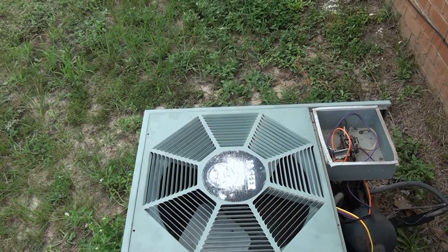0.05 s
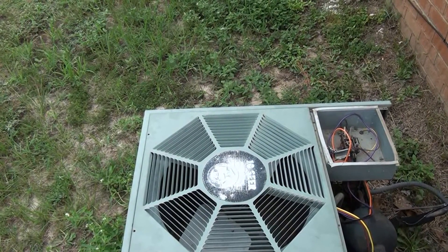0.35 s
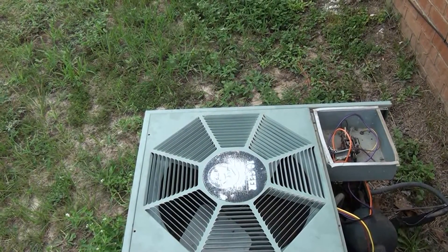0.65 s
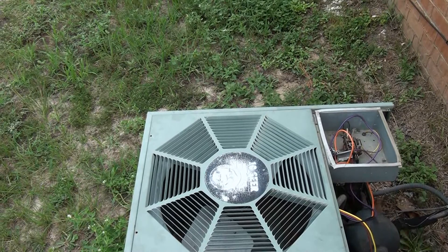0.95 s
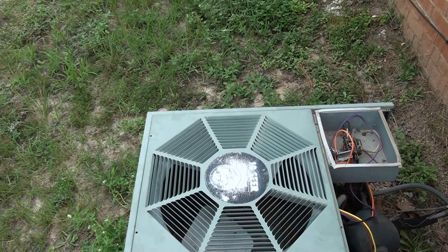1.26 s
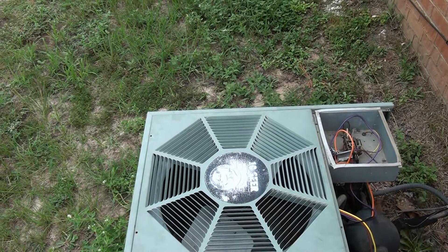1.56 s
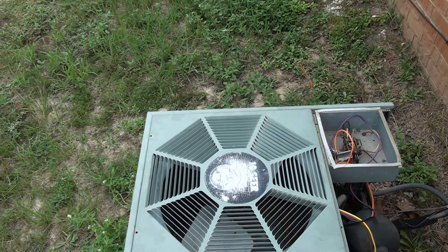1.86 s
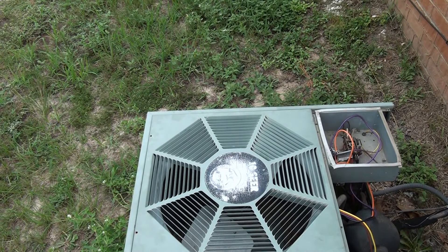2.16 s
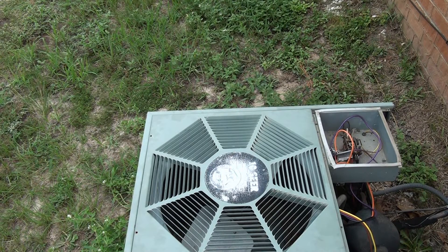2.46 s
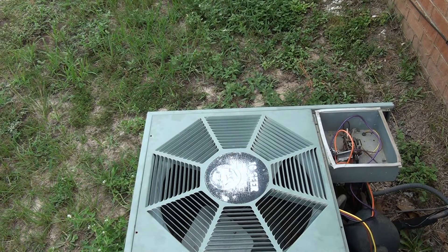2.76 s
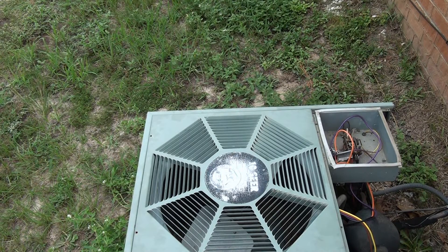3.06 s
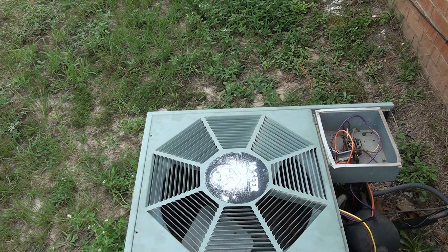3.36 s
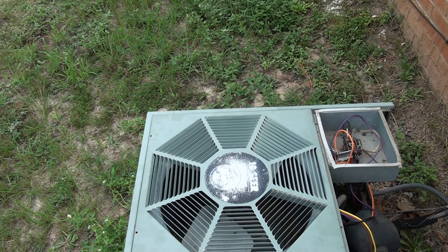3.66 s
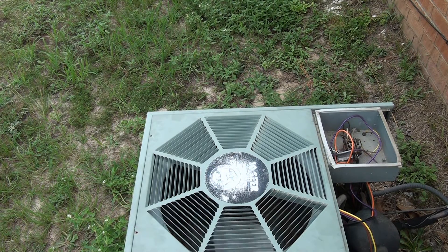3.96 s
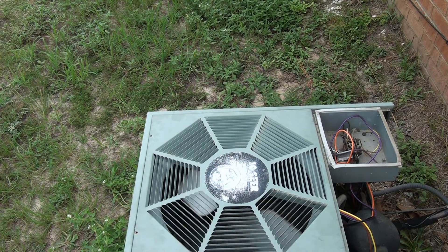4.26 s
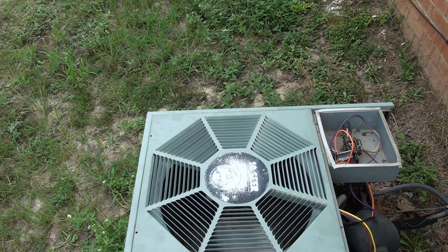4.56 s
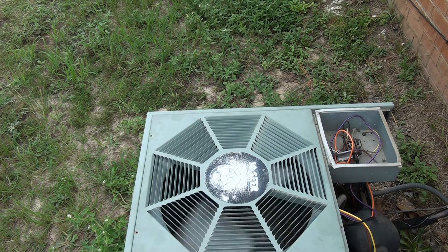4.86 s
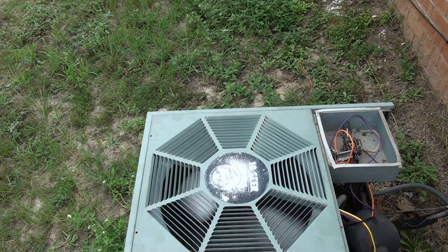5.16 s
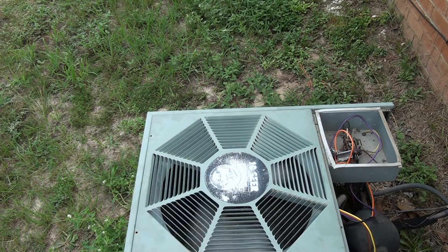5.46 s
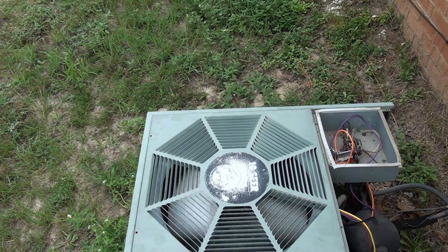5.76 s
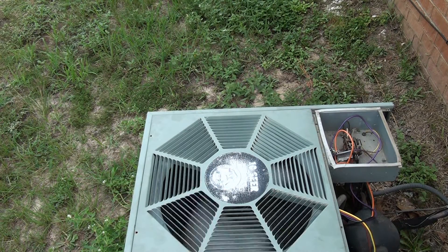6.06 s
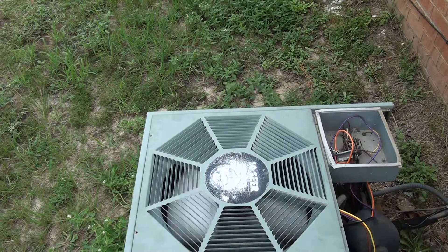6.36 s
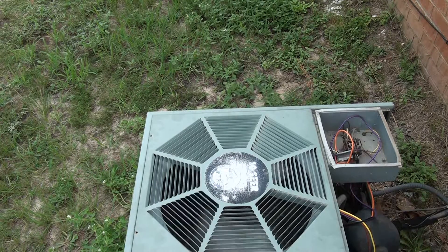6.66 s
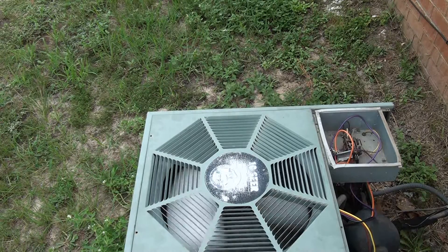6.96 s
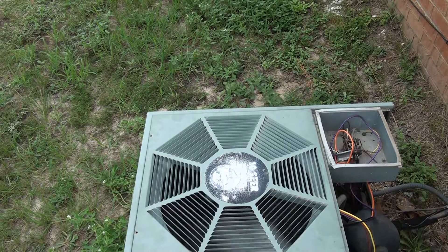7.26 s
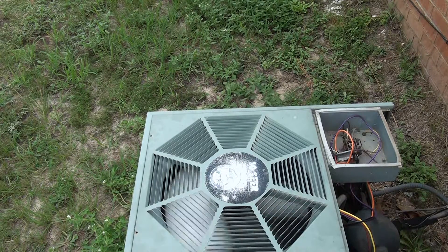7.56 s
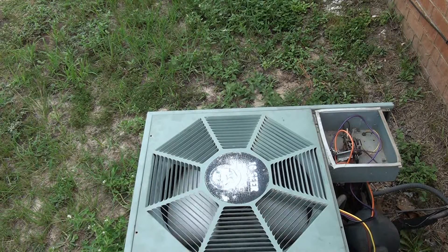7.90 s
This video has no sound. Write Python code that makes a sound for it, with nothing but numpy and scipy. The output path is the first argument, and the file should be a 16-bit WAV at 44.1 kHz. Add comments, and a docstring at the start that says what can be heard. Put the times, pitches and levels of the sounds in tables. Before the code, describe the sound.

A quiet garden holds faint distant traffic and a few soft rustles. About four seconds in, an outdoor air conditioner starts with a sharp clack and metallic jolts. Its compressor knocks rapidly, then settles into a whine over an electric hum while the fan builds to a loud, steady roar. Refrigerant hisses through the pipes and loose sheet metal ticks and chatters. The microphone is just above the fan grille.

```python
"""An outdoor air conditioner on a lawn, heard from just above its fan grille.
First a quiet garden: distant traffic, a few rustles, a thin whistle. At 3.9 s the contactor snaps shut
and the compressor jolts; it knocks once a turn, then settles into a whine over mains hum. The fan spins
up to a roar by about 6 s. Meanwhile, from 5 s on, refrigerant surges through the pipes and loose sheet
metal chatters; a last, softer surge comes near 8 s."""
import sys
import numpy as np
from scipy import signal
from scipy.fft import rfft, irfft, next_fast_len
from scipy.io import wavfile
from scipy.ndimage import uniform_filter1d

SR = 44100
rng = np.random.default_rng(int(sys.argv[2]) if len(sys.argv) > 2 else 0)


def transcribe(signal):
    """Save signal, clipped to [-1, 1], as a 16-bit WAV file at the path in sys.argv[1]."""
    frames = np.atleast_2d(signal).T
    limited = np.clip(frames, -1, 1)
    pcm = np.round(limited * 32767).astype(np.int16)
    wavfile.write(sys.argv[1], SR, pcm)


N = 358533
T = np.arange(N) / SR
START_S, LOAD_S, PRESSURE_RISE_S = 3.88, 4.16, 0.84
MAINS_HZ = 59.96


def undb(db):
    """Decibels to gain."""
    return 10 ** (np.asarray(db) / 20)


def noise():
    """White noise, rms 1."""
    return rng.standard_normal(N)


def unit_rms(x):
    """Scale to rms 1."""
    return x / np.std(x)


def walk(rate_hz):
    """Smooth random drift, spread 1."""
    step = int(SR / rate_hz)
    stairs = np.repeat(noise()[:N // step + 1], step)
    return unit_rms(uniform_filter1d(stairs, step)[:N])


def curve(rows):
    """Straight lines through (time, value) rows."""
    return np.interp(T, *np.transpose(rows))


def held(start_s, attack_s, hold_s, release_s):
    """Trapezoid envelope, 0 to 1 and back."""
    return np.interp(T, start_s + np.cumsum([0, attack_s, hold_s, release_s]), [0, 1, 1, 0])


def settle(start_s, rise_s):
    """Smooth rise from 0 to 1."""
    return np.tanh(np.maximum(T - start_s, 0) / rise_s)


def swell(peak_s, db, rise_db_per_s, fall_db_per_s):
    """Gain that rises to a peak and falls, linearly in dB."""
    before_s, after_s = np.maximum(peak_s - T, 0), np.maximum(T - peak_s, 0)
    return undb(db - rise_db_per_s * before_s - fall_db_per_s * after_s)


def decay(age_s, t60_s):
    """Exponential fall, 60 dB in t60_s."""
    return undb(-60 * age_s / t60_s)


def blow(start_s, t60_s):
    """Envelope with a sudden rise and exponential fall."""
    envelope, first = np.zeros(N), int(start_s * SR)
    age_s = T[:min(int(2 * t60_s * SR), N - first)]
    envelope[first:first + len(age_s)] = decay(age_s, t60_s)
    return envelope


def gains(spectrum, fft_size):
    """Gain of a (frequency, level) spectrum at each FFT bin."""
    hz, db = np.transpose(spectrum)
    bins_hz = np.maximum(np.fft.rfftfreq(fft_size, 1 / SR), 1)
    return undb(np.interp(np.log(bins_hz), np.log(hz), db))


def colour(x, spectrum, size=8192):
    """Minimum-phase filter; white noise keeps its power."""
    cepstrum = irfft(np.log(gains(spectrum, size)))
    cepstrum[1:size // 2] *= 2
    response = irfft(np.exp(rfft(cepstrum[:size // 2], size)))
    return signal.oaconvolve(x, response / np.linalg.norm(response))[:N]


def ringing(x, modes):
    """Bank of steep resonances, each scaled to its own level."""
    total = 0
    for hz, width_hz, db in modes:
        b, a = signal.iirpeak(hz, hz / width_hz, fs=SR)
        total = total + undb(db) * unit_rms(signal.lfilter(b, a, signal.lfilter(b, a, x)))
    return total


def partials(cycles, harmonics, waver_db, waver_hz):
    """Sines locked to a cycle count, each wavering in level."""
    total = 0
    for multiple, db in harmonics:
        amplitude = np.sqrt(2) * undb(db + waver_db * walk(waver_hz))
        total = total + amplitude * np.sin(2 * np.pi * (multiple * cycles + rng.random()))
    return total


# traffic and rustle spectra (frequency [Hz], relative level [dB])
TRAFFIC_SPECTRUM = [(20, -11), (45, -7), (62, 2.5), (95, -6.5), (200, -2), (350, -10), (500, -7),
                    (900, -6.5), (1300, -16.5), (2300, -22), (5000, -25.5), (11000, -30.5), (16000, -38)]
RUSTLE_SPECTRUM = [(1000, -12), (2000, -5), (5000, -6), (7000, -4), (9500, 2), (13000, -6), (16000, -12)]
# traffic loudness (time [s], level [dB])
TRAFFIC_LEVEL = [(0, -42.5), (.7, -43.5), (1.05, -45.5), (3.8, -44)]
# far machinery and passing engine (frequency [Hz], width [Hz], relative level [dB])
DRONE_TONES = [(127, 21, -52), (258.7, 15, -60)]
ENGINE_TONES = [(144, 11, -1.5), (497.5, 31, -6.5)]
# soft rustles (start [s], hold [s], level [dB])
RUSTLES = [(0, .01, -53.5), (.34, 0.022, -53.5), (0.485, .1, -55), (.63, .11, -48.5)]


def garden():
    """Distant traffic, machinery and a passing engine; brief rustles and a thin whistle close by."""
    traffic = colour(noise(), TRAFFIC_SPECTRUM) * undb(curve(TRAFFIC_LEVEL) + 0.33 * walk(5.64))
    engine = swell(0.36, -45.5, rise_db_per_s=24, fall_db_per_s=21) * ringing(noise(), ENGINE_TONES)
    touches = sum(undb(db) * held(start_s, 0.035, hold_s, 0.025) for start_s, hold_s, db in RUSTLES)
    rustle = colour(noise() * touches * undb(1.8 * walk(81)), RUSTLE_SPECTRUM)
    whistle = held(0, 0.01, 0.75, 0.04) * ringing(noise(), [(3332, 35, -70)])
    drone = ringing(noise(), DRONE_TONES)
    return traffic + drone + engine + rustle + whistle


# fan spin-up (time [s], blade-pass rate [Hz])
BLADE_RATE = [(3.88, 5), (4.5, 42), (5, 65), (5.4, 75), (5.7, 76.7)]
ROAR_EXPONENT = 2.3


def airflow(lag_s=0.27):
    """Air speed, 1 when full; it lags the blades."""
    fan_speed = (T > START_S) * curve(BLADE_RATE) / BLADE_RATE[-1][1]
    pole = np.exp(-1 / (lag_s * SR))
    return signal.lfilter([1 - pole], [1, -pole], fan_speed)


def draught(level_db=-51):
    """The air stream rumbles on each microphone separately, growing steeply with speed."""
    spectrum = [(10, 15), (30, 13), (60, 3), (150, -60), (600, -27)]
    rumble = [colour(noise() * undb(2 * walk(4.5)), spectrum) for _ in range(2)]
    return undb(level_db) * airflow() ** 4 * np.array(rumble)


# refrigerant surges (peak time [s], level [dB], rise [dB/s], fall [dB/s])
SURGES = [(5.32, -22.5, 60, 200), (5.44, -20, 110, 14.5), (5.63, -22, 40, 14), (8.1, -27, 28, 20)]
# pipe rush (frequency [Hz], relative level [dB])
RUSH_SPECTRUM = [(400, -14), (800, 10.5), (1100, 4.5), (1800, 5), (2350, -4.5), (2900, -2), (3900, -3),
                 (5000, -17.5), (7000, -11), (8800, -5.5), (11000, -9), (12800, -20), (15500, -24)]


def refrigerant(sputter_db=3.5):
    """Gas and liquid sputter through the pipes in surges."""
    rush = np.linalg.norm([swell(*surge) for surge in SURGES], axis=0)
    sputter = undb(sputter_db * np.minimum(walk(90), 1))
    return (T > LOAD_S) * colour(noise() * rush * sputter, RUSH_SPECTRUM)


# loudest ticks (time [s], relative peak [dB])
TICKS = [(5.0659, -14), (5.2806, -13.5), (5.3569, -10), (5.417, -9), (6.19, -10), (6.915, -15),
         (6.9735, -14), (7.0231, -17), (7.1055, -9), (7.14, -11), (7.395, -10.5), (7.5477, -10),
         (7.698, -7), (7.8573, -9)]
# panel response (frequency [Hz], relative level [dB])
PANEL_SPECTRUM = [(1200, -11), (3000, -14), (5000, 4.5), (6800, 1.5), (8800, 8), (11000, 1.5), (12700, -6),
                  (14200, -2), (16000, -27)]
# its brightest modes (frequency [Hz], width [Hz], relative level [dB])
PANEL_MODES = [(8460, 470, -26), (9000, 140, -11), (9600, 210, -13), (10800, 300, -16), (14240, 600, -14)]


def loose_panel(tick_gain_db=-14, tick_t60_s=0.062, strays_per_s=7.4):
    """Sheet metal ticks and chatters on swings of the hum; stray ticks and chatter grow with airflow."""
    swings_s = np.arange(START_S, T[-1], 1 / (2 * MAINS_HZ))

    def tapping(sizes, t60_s):
        taps = np.zeros(N)
        taps[(swings_s * SR).astype(int)] = sizes
        return signal.lfilter([1], [1, -decay(1 / SR, t60_s)], taps)

    flow = airflow()
    force = np.clip(rng.standard_normal(len(swings_s)), -2, 2)
    catches = rng.random(len(swings_s)) < strays_per_s / (2 * MAINS_HZ)
    strays = flow ** 2 * tapping(catches * undb(-14.5 + 2 * force), tick_t60_s)
    loudest = sum(undb(db) * blow(time_s, tick_t60_s) for time_s, db in TICKS)
    ticks = undb(tick_gain_db) * np.hypot(strays, loudest)
    chatter = flow ** ROAR_EXPONENT * tapping(undb(-36 + 5 * force), t60_s=0.032)
    contact = np.hypot(ticks, chatter) * noise()
    return colour(contact, PANEL_SPECTRUM) + np.std(contact) * ringing(contact, PANEL_MODES)


# blade tones (blade-pass multiple, level [dB])
BLADE_TONES = [(1, -41.5), (2, -34), (6, -33)]
# turbulence in cabinet and grille (frequency [Hz], relative level [dB])
ROAR_SPECTRUM = [(25, -34), (60, -14.5), (100, -8), (150, -5.5), (240, 1), (300, 1), (390, -4.5),
                 (560, -5.5), (740, -1), (890, -4), (1030, -10), (1750, -9.5), (2350, -22), (4000, -50)]
HISS_SPECTRUM = [(1350, -32), (2300, -4), (2910, 7.5), (3160, 1), (3800, 2.5), (4510, -3.5), (5940, -5.5),
                 (7050, -7.5), (9290, -9.5), (11300, -13.5), (12700, -28), (14600, -10), (16000, -22)]
# cabinet and pipe resonances (frequency [Hz], width [Hz], level re roar [dB])
CABINET_MODES = [(272, 33, -15.5), (797, 10.4, -16.5), (1547, 25, -21), (2826, 26, -27.5)]


def fan(roar_db=-17, hiss_db=-31, chop_depth=0.044):
    """Blade tones rise with speed; blade-chopped turbulence roars in the cabinet; the grille hisses."""
    passes = np.cumsum(curve(BLADE_RATE)) / SR
    flow = airflow()
    swirl = (1 + chop_depth * np.cos(2 * np.pi * passes)) * undb(-0.1 * walk(8.2))
    roar = colour(noise() * swirl, ROAR_SPECTRUM) + ringing(noise(), CABINET_MODES)
    hiss = colour(noise() * undb(1.5 * walk(70)), HISS_SPECTRUM)
    tones = flow ** 5 * partials(passes, BLADE_TONES, waver_db=1, waver_hz=2.6)
    return undb(roar_db) * flow ** ROAR_EXPONENT * roar + undb(hiss_db) * flow ** 1.9 * hiss + tones


# start-up blows: the contactor's sharp clack, then duller compressor jolts on its mounts
# (time [s], relative peak [dB], t60 [s], tilt [dB/octave])
STARTUP_BLOWS = [(3.8807, -6, 0.19, -1), (3.942, -14.5, 0.12, -6), (3.957, -12.5, 0.19, 0),
                 (3.972, -10.5, 0.2, -4), (3.991, -10, 0.19, 0.5), (4.002, -7, .055, -5),
                 (4.012, -16, .035, 0), (4.026, -13.5, 0.29, -5.5)]
# dense sheet-metal modes (frequency [Hz], relative level [dB])
CRASH_SPECTRUM = [(60, -50), (170, -23), (250, -5), (480, -15), (680, -0.5), (850, 0.5), (1100, -8),
                  (1700, 0), (2300, -1.5), (4300, -1), (6500, -4), (8500, -0.5), (11500, -5.5),
                  (13000, -13), (16000, -16)]
# clear casing modes (frequency [Hz], relative level [dB], t60 [s])
CASING_MODES = [(274, -14, 0.63), (363, -8.5, 0.55), (658, -8, 0.33), (813, -1, 0.29), (1065, -9.5, 0.27),
                (1550, -8, 0.15), (2253, -9.5, 0.39), (4188, -5, 0.17), (4660, -11, 0.23),
                (5000, -23, 0.18), (7550, -10, 0.092), (8000, -11, 0.13), (11000, -16, .08)]


def clank(crash_gain_db=-9, ring_gain_db=-17.5, clack_cutoff_hz=18100, jolt_cutoff_hz=10700):
    """The contactor snaps shut, then the compressor jolts; each blow crashes and rings in the casing."""
    crash, impulses = 0, np.zeros(N)
    for i, (time_s, db, t60_s, tilt_db) in enumerate(STARTUP_BLOWS):
        lowpass = signal.butter(4, jolt_cutoff_hz if i else clack_cutoff_hz, fs=SR, output="sos")
        burst = undb(db) * signal.sosfilt(lowpass, blow(time_s, t60_s) * noise())
        tilted = [(hz, level_db + tilt_db * np.log2(hz)) for hz, level_db in CRASH_SPECTRUM]
        crash = crash + colour(burst, tilted)
        impulses[int(time_s * SR)] = undb(db)
    age_s = T[:SR]
    ring = sum(undb(db) * decay(age_s, t60_s) * np.sin(2 * np.pi * hz * age_s)
               for hz, db, t60_s in CASING_MODES)
    return undb(crash_gain_db) * crash + undb(ring_gain_db) * signal.oaconvolve(impulses, ring)[:N]


# compressor shell and base pan (frequency [Hz], width [Hz], relative level [dB])
SHELL_MODES = [(285, 160, -7.5), (565, 250, -3.5), (673, 115, -6.5), (833, 110, -9), (1230, 120, -3),
               (1580, 230, -2.5), (1750, 190, -6.5), (3444, 190, -8), (3910, 260, -8), (4510, 310, -6.5),
               (5020, 250, -11.5), (5900, 370, -8.5), (7780, 460, -10.5), (7950, 450, -10.5),
               (8700, 430, -11.5), (9820, 530, -9), (11300, 1800, -15.5)]
PAN_MODES = [(265, 20, -3.5), (366, 7.2, -13)]


def piston_knock(turns, pressure, dry_db=-23.5, running_db=-39, size=700):
    """One hit a turn rings the shell: hard over a booming pan while running dry, light under load."""
    def impact(phase, rise_turns=0.024, fall_turns=0.17):
        return (1 - np.exp(-phase / rise_turns)) * np.exp(-phase / fall_turns)

    hits = np.diff(np.floor(turns), prepend=np.floor(turns[0]))
    steel_paths = rfft(impact(np.arange(size) / size) * rng.standard_normal(size))
    thud = signal.oaconvolve(hits, irfft(steel_paths / abs(steel_paths)))[:N]  # alike on each turn
    grit = impact(turns % 1) * np.gradient(noise())  # new treble on each turn
    rubbing = undb(-13) * noise()
    stroke = unit_rms(thud) + 0.9 * unit_rms(grit) + rubbing
    dry_run = held(3.928, attack_s=0.39, hold_s=0.12, release_s=0.16)
    body = unit_rms(ringing(stroke, SHELL_MODES)) + dry_run * ringing(noise(), PAN_MODES)
    envelope = np.hypot(undb(dry_db) * dry_run, undb(running_db) * pressure ** 2)
    return body * envelope * undb(1.8 * walk(40))


# strong partials (shaft multiple, level [dB])
WHINE_PARTIALS = [(11, -38.5), (13, -52), (14, -44), (16, -42.5), (18, -44.5), (22, -47), (26, -42),
                  (38, -53), (48, -46), (67, -54), (71, -58), (72, -52.5), (74, -72), (100, -51),
                  (102, -66)]
# bed of weak partials (frequency [Hz], relative level [dB])
BUZZ_SPECTRUM = [(170, -19.5), (270, -9.5), (430, -2), (560, -7), (760, -1.5), (1100, -9.5), (1600, -8.5),
                 (2400, -16), (3800, -17.5), (6000, -24), (9800, -24.5), (13000, -62)]


def shaft_whine(turns, strain, buzz_gain_db=-27.5, strain_lift_db=2, size=4096):
    """Shaft-locked partials over a rough buzz that throbs once a turn; strain lifts both."""
    pumping = 1 + 0.29 * np.cos(2 * np.pi * (turns - 0.2))
    one_turn = irfft(np.r_[0, np.exp(2j * np.pi * rng.random(270))], size)
    pattern = np.interp(turns % 1, np.arange(size) / size, unit_rms(one_turn))
    buzz = undb(buzz_gain_db) * colour(pumping * (0.4 * pattern + noise()), BUZZ_SPECTRUM)
    tones = partials(turns, WHINE_PARTIALS, waver_db=3, waver_hz=3.2)
    return (tones + buzz) * undb(strain_lift_db * strain) * settle(START_S, rise_s=0.062)


# magnetic hum (mains multiple, level [dB])
HUM_PARTIALS = [(2, -28), (4, -31), (6, -35.5), (12, -32), (14, -39.5), (20, -39), (28, -65), (38, -68)]


def mains_hum(pressure, strain, strain_lift_db=9):
    """Magnetic hum builds with pressure; strain lifts the sixth harmonic, which lies on a casing mode."""
    harmonics = [(k, db + strain_lift_db * strain * (k == 6)) for k, db in HUM_PARTIALS]
    return pressure * partials(MAINS_HZ * T, harmonics, waver_db=0.45, waver_hz=4.6)


# compressor run-up (time [s], shaft rate [Hz])
SHAFT_RATE = [(3.88, 10), (4.0, 52), (4.11, 48), (4.13, 54.5), (4.15, 59.5), (4.2, 58.91)]
# housing resonances (frequency [Hz], width [Hz], relative level [dB])
HOUSING_MODES = [(709, 83, 3), (834, 34, 0.5), (1057, 8, -7.5), (1530, 14, -7.5), (1930, 31, -7),
                 (2810, 82, -17), (4240, 39, -23), (5960, 130, -20)]


def compressor(knock_at_s=4.3413, housing_gain_db=-32.5):
    """The shaft slips behind the mains, so whine and hum beat; strain rings the housing as load builds."""
    turns = np.cumsum(curve(SHAFT_RATE) * (1 + 0.0008 * walk(5))) / SR
    turns -= np.interp(knock_at_s, T, turns)
    pressure = settle(LOAD_S, PRESSURE_RISE_S)
    strain = held(4.48, attack_s=0.036, hold_s=0.91, release_s=0.36)
    motor = shaft_whine(turns, strain) + mains_hum(pressure, strain)
    housing = undb(housing_gain_db) * strain * ringing(noise(), HOUSING_MODES)
    return (T > START_S) * (piston_knock(turns, pressure) + motor + housing)


def place(x, pan_db, scatter, size):
    """Direct sound plus quick cabinet and wall reflections that differ left and right."""
    echoes = rfft(rng.standard_normal(size) * np.linspace(1, 0, size) ** 2, 2 * size)
    response = irfft(echoes / abs(echoes) * gains(scatter, 2 * size))
    side = signal.oaconvolve(x, response[:size])[:N]
    return np.array([(x + side) * undb(pan_db / 2), (x - side) * undb(-pan_db / 2)])


def lean(stereo, balance):
    """Frequency-dependent pan."""
    size = next_fast_len(N)
    left = np.sqrt(gains(balance, size))
    return irfft(rfft(stereo, size) * np.array([left, 1 / left]), size)[:, :N]


# scattered sound (frequency [Hz], level re direct [dB])
UNIT_SCATTER = [(60, -9), (110, -14), (200, -13.5), (380, -14.5), (700, -14.5), (1290, -21), (2380, -12.5),
                (4400, -16.5), (8120, -25), (15000, -53)]
GARDEN_SCATTER = [(60, -35), (110, -40), (200, -25), (380, -15), (700, -17), (1290, -8.5), (2380, -9),
                  (4400, -9), (8120, -17.5), (15000, -34)]
# the unit's balance (frequency [Hz], left minus right [dB])
UNIT_BALANCE = [(110, 3), (250, -0.5), (700, -0.5), (2400, -1.5), (12000, -0.5)]


def scene():
    """Fan straight below, compressor slightly right; the garden arrives by longer paths."""
    machine = place(clank() + compressor(), pan_db=-0.6, scatter=UNIT_SCATTER, size=512)
    stream = place(fan() + refrigerant() + loose_panel(), pan_db=0.5, scatter=UNIT_SCATTER, size=2048)
    outdoors = place(garden(), pan_db=0, scatter=GARDEN_SCATTER, size=4096)
    return lean(machine + stream, UNIT_BALANCE) + outdoors + draught()


def record(dry):
    """Steep low-pass at 15.85 kHz."""
    return signal.sosfilt(signal.ellip(10, 0.2, 80, 15850, fs=SR, output="sos"), dry)


dry = scene()
out = record(dry)
transcribe(out)
```